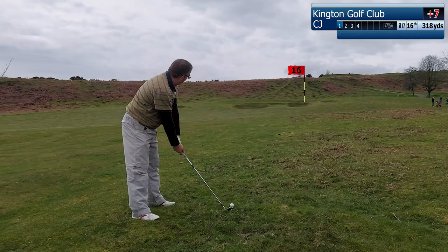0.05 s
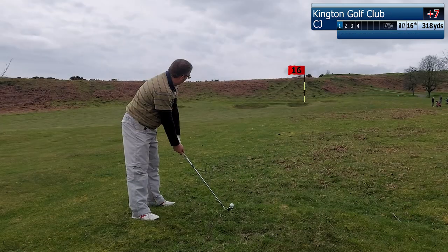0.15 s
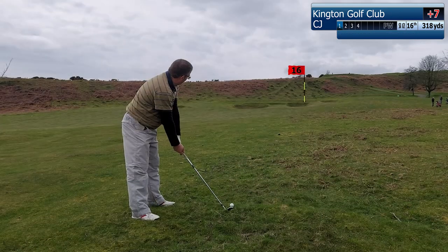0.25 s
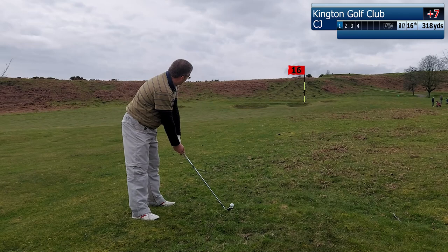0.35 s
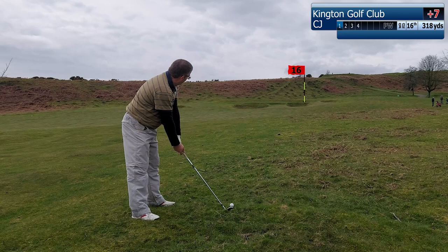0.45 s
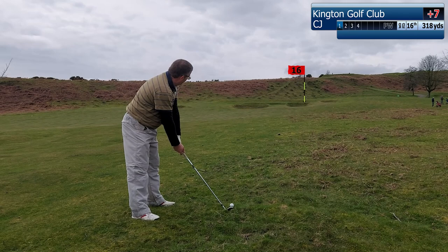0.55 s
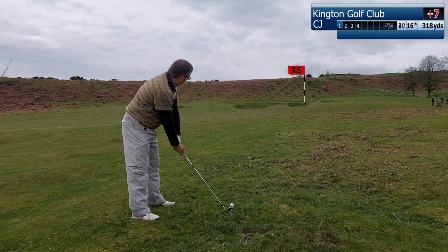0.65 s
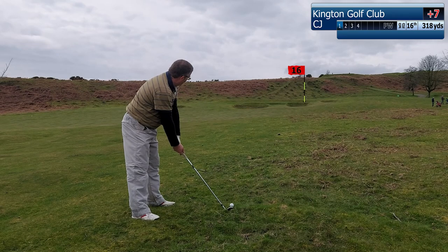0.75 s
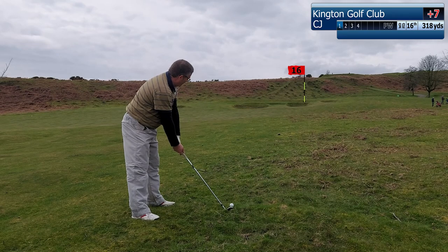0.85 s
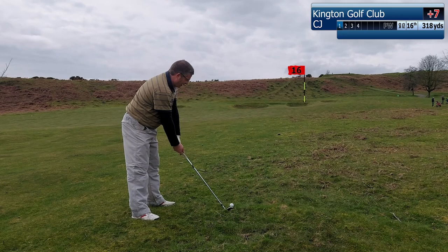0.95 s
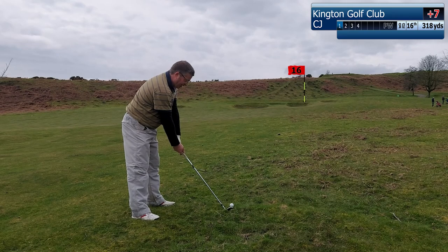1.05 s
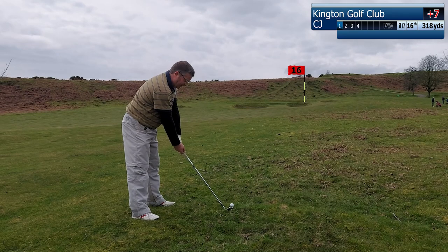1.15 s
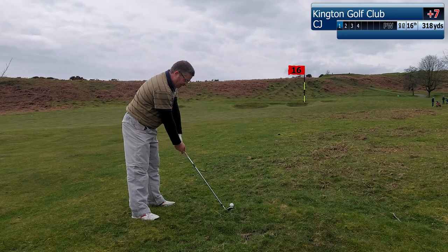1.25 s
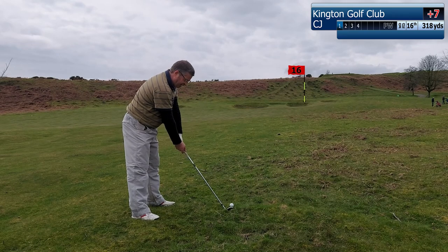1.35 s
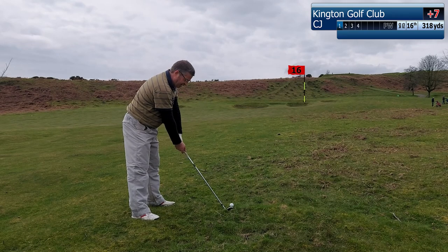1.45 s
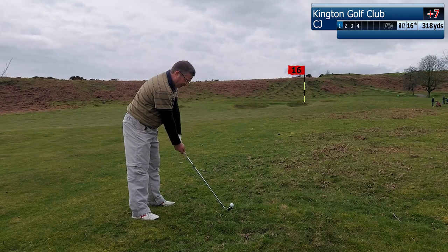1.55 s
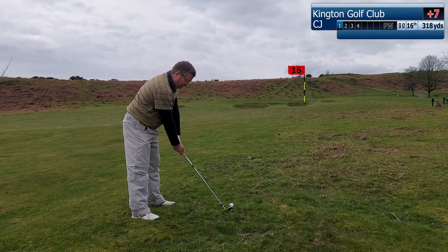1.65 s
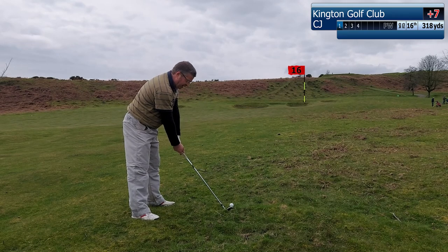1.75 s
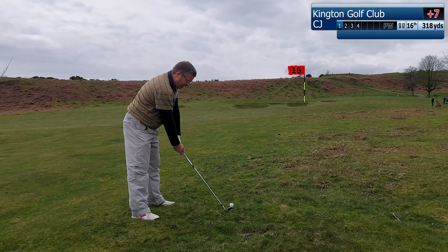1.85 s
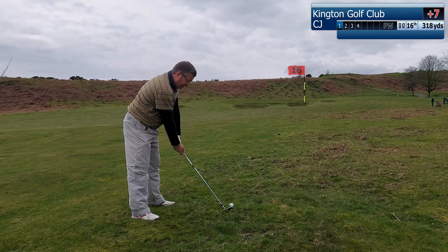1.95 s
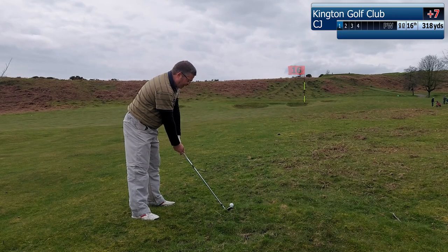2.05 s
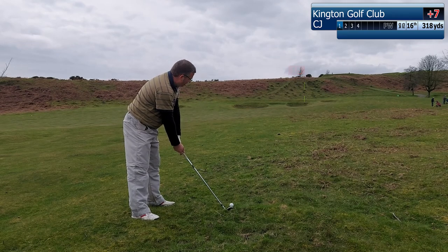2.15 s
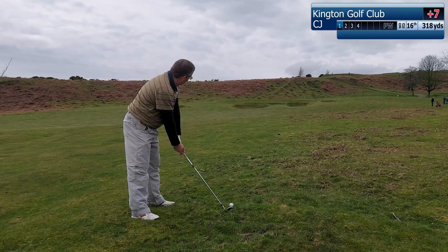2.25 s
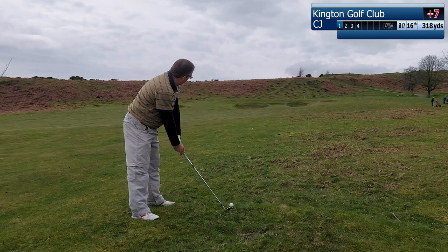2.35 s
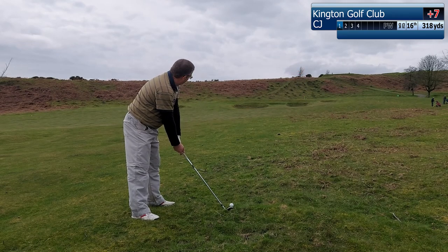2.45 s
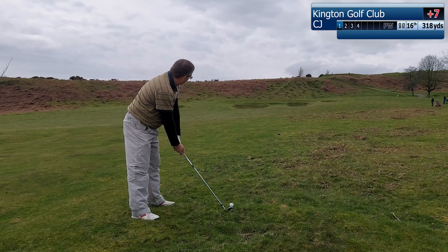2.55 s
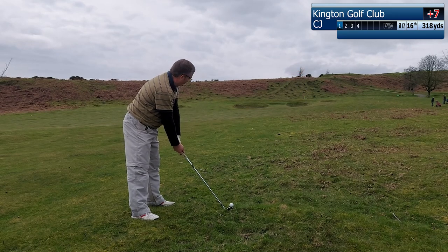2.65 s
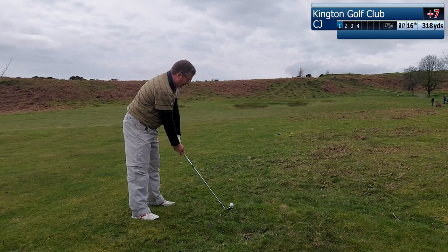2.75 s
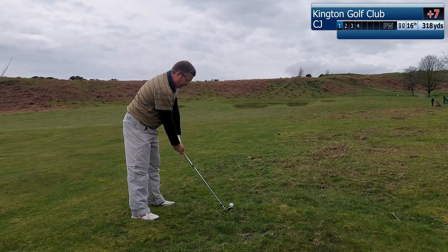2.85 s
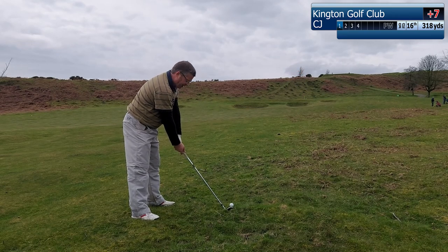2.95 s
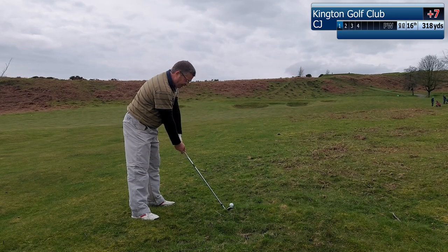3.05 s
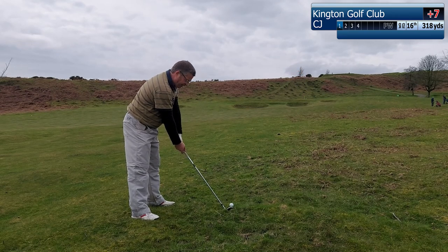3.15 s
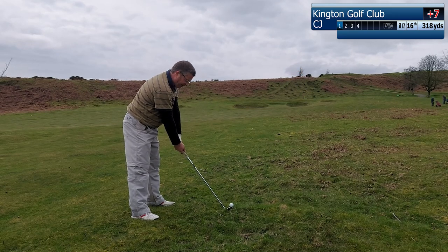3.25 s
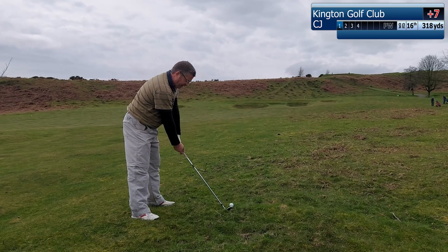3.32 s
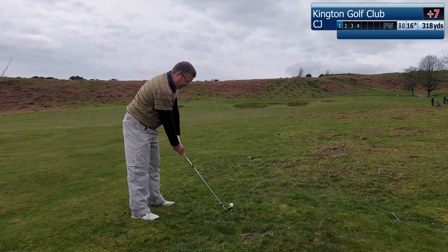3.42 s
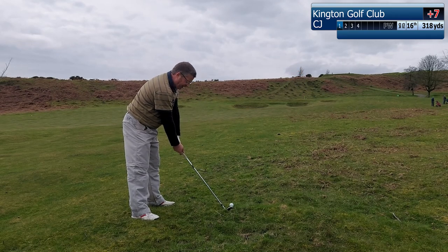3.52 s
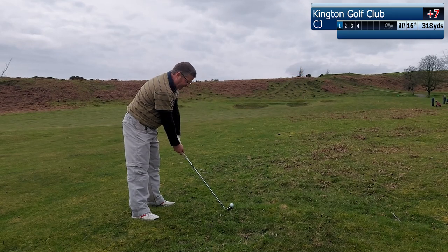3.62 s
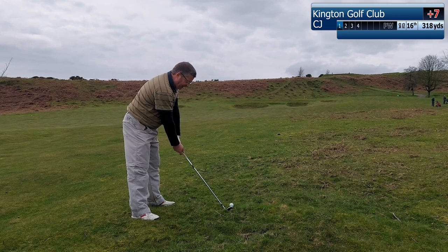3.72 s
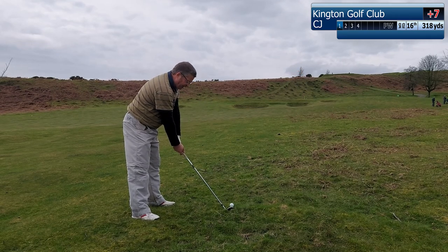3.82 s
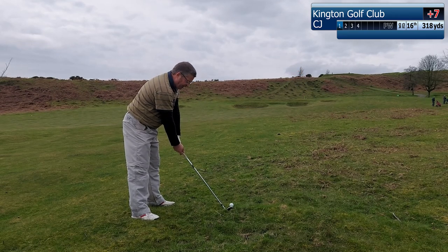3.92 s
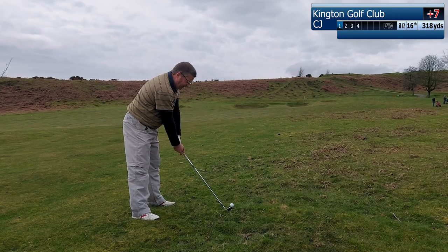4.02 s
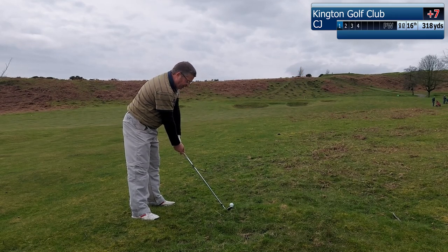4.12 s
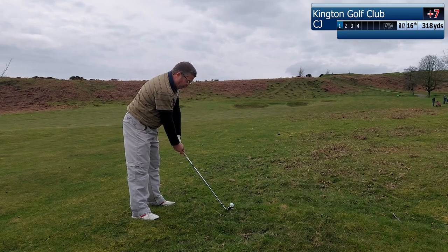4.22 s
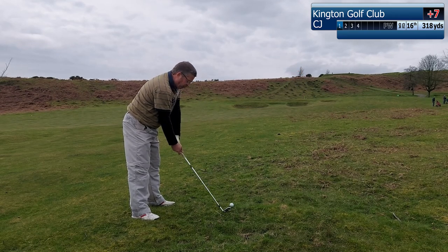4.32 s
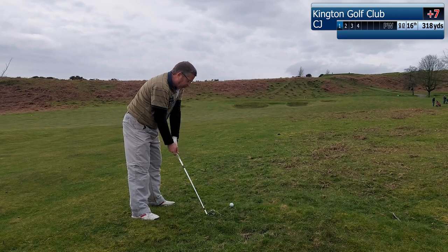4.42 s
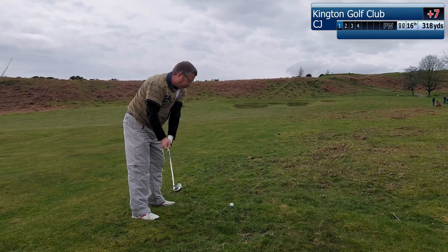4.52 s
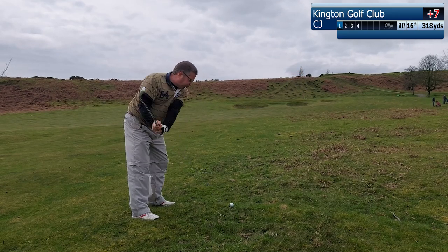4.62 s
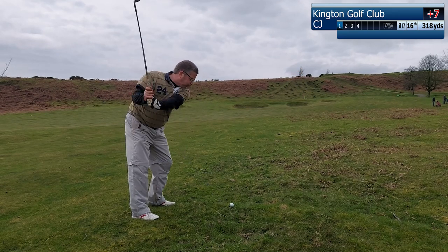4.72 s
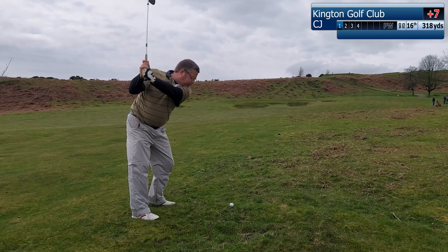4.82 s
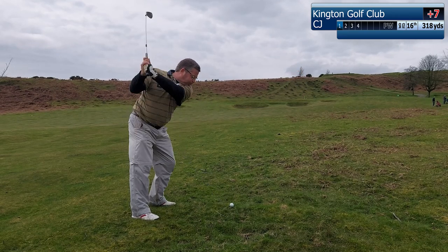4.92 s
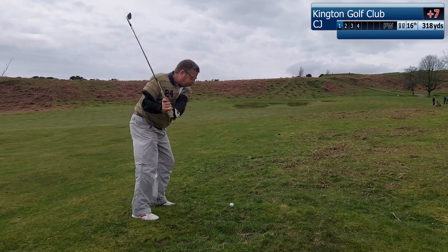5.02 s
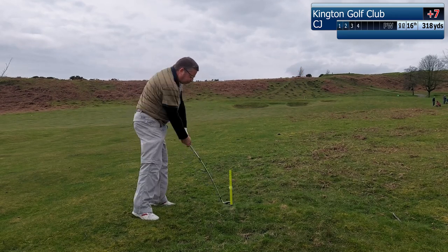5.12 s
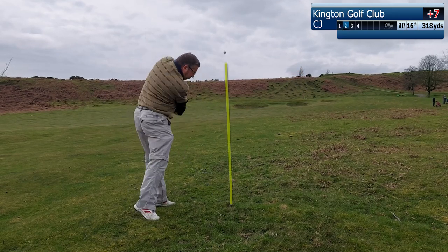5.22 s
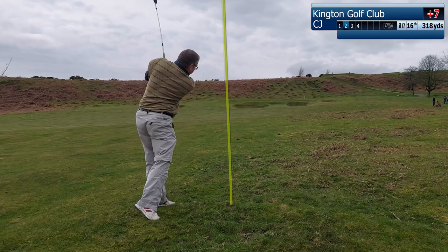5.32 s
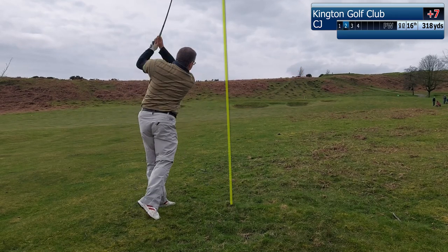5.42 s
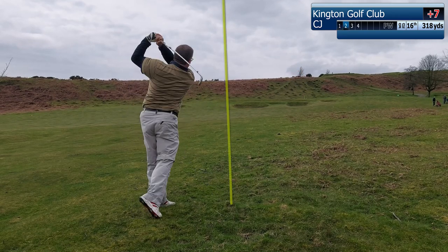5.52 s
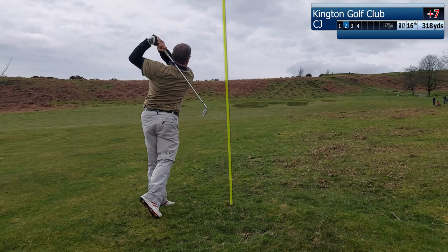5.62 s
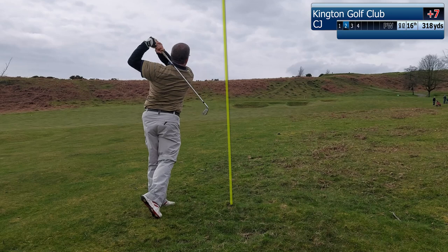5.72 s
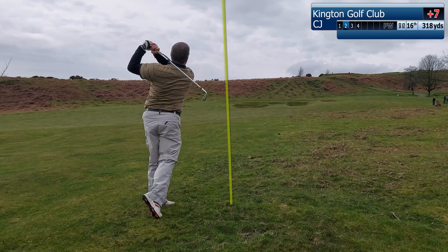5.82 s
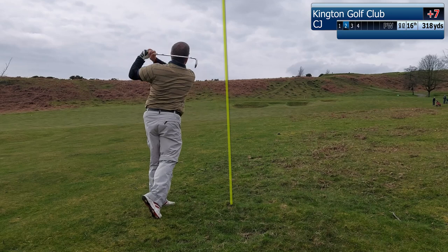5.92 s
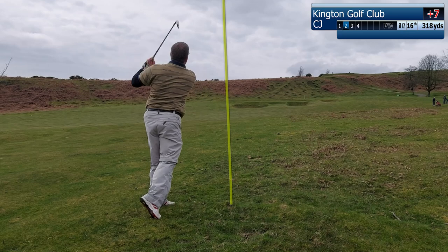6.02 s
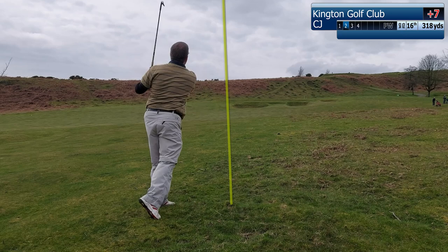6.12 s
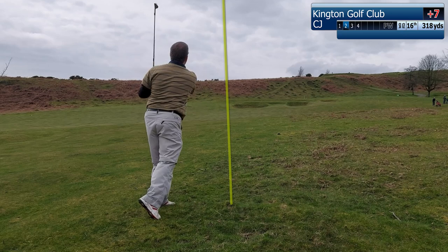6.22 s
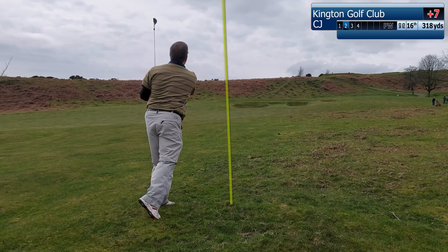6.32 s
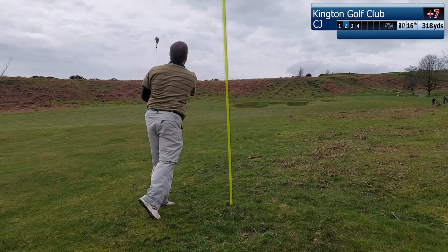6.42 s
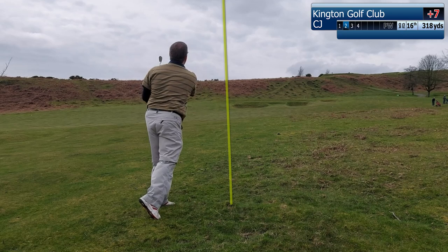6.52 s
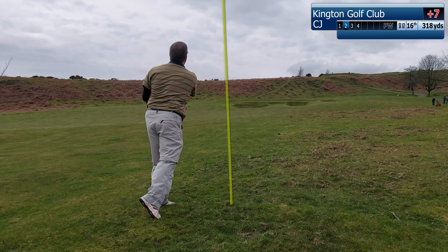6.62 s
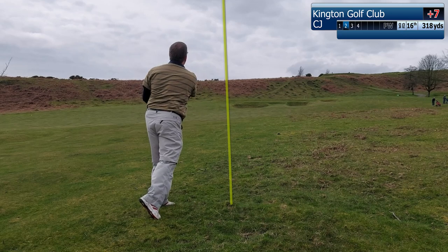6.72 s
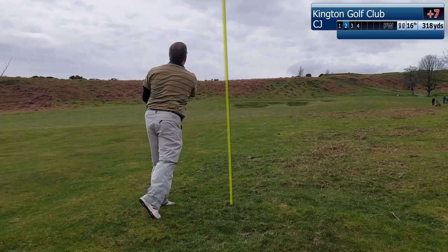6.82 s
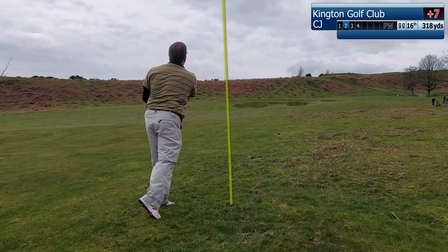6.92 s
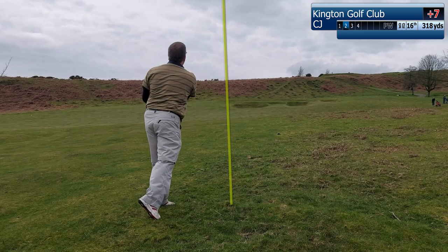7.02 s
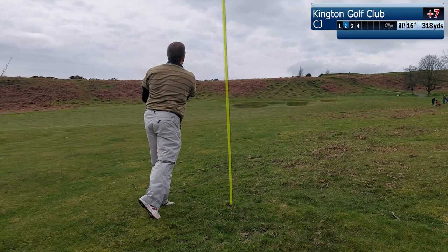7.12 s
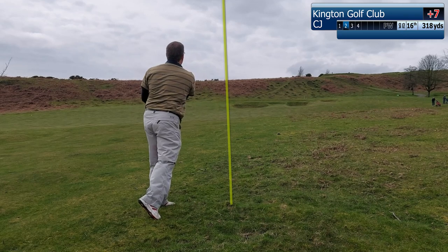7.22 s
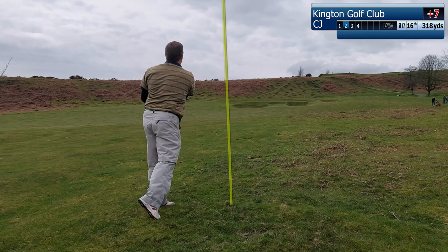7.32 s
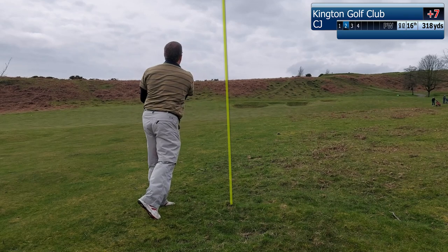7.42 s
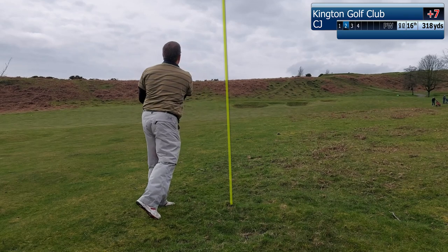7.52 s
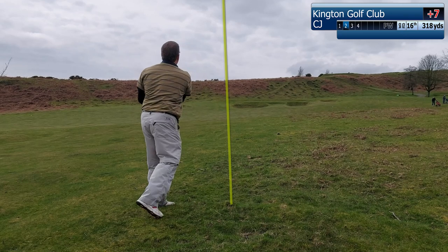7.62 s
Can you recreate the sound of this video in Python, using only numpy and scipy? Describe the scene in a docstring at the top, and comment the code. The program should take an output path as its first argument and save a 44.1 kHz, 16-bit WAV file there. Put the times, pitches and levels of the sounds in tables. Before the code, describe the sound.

An open hillside golf course in breezy weather, heard in stereo for about 7.7 seconds. Throughout, deep uneven gusts thump and flutter on the microphone, different at each side, over soft hiss and wind rushing through grass. From 0 to 1.3 s a bird to the right gives steady whistles around 3 kHz; from 1.4 to 3.4 s come quick throbbing trills and falling chirps, then rising whistles at 3.5 to 4.1 s and more trills until 4.9 s. The background dips around 5 s. At about 5.1 s a very brief swish climbs, and at 5.16 s an iron hits the ball: one loud, dry, sharp click with a low thud and a short hissy scuff of turf. From 6.0 to 6.9 s the nearest bird sings ten evenly spaced, clear notes, gradually descending. Wind returns, with chirps and tiny dry ticks near 7 s.

```python
"""Gusts buffet both microphone ports, songbirds whistle and trill from the right, and then
an iron strikes a golf ball off the turf of an open hillside course.
Wind and hiss are shaped noise, bird notes are gliding sines with scattered echoes, the swing
is rough noise with a hum, and the strike is soft clicks ringing short modes amid torn turf."""
import sys
import numpy as np
from scipy import signal
from scipy.fft import rfft, irfft
from scipy.io import wavfile

SR = 44100
rng = np.random.default_rng(int(sys.argv[2]) if len(sys.argv) > 2 else 0)


def dump_mix(stems):
    """Bounce the given channels to the path in sys.argv[1] as a 16-bit WAV at rate SR."""
    frames = np.atleast_2d(stems).T  # one column per channel
    limited = np.clip(frames, -1, 1)  # hard clip at full scale
    pcm = np.round(limited * 32767).astype(np.int16)
    wavfile.write(sys.argv[1], SR, pcm)


N = 338082

RIGHT_SOURCE_LAG_S = .00049   # sound from the right reaches the left port this much later


def from_db(db):
    """Turn decibels into gain."""
    return 10 ** (np.asarray(db) / 20)


def rms_one(x):
    """Scale to an average strength (rms) of 1."""
    return x / np.sqrt(np.mean(x ** 2) + 1e-20)


def in_time(rows):
    """Join the points of a table by straight lines: one curve per column after the time."""
    time_s, *columns = np.transpose(rows)
    return [np.interp(np.arange(N) / SR, time_s, column) for column in columns]


def drift(rate_hz):
    """Slow random wandering with spread 1: noise at every 40th sample, smoothed twice."""
    pole = np.exp(-80 * np.pi * rate_hz / SR)
    noise = rng.standard_normal(N // 40 + 2002)
    slow = signal.lfilter([1], [1, -2 * pole, pole * pole], noise)[2000:]   # skip the settling
    return np.interp(np.arange(N) / 40, np.arange(len(slow)), rms_one(slow))


def coloured(spectrum, channels, size=N):
    """Unrelated noises of the given spectrum, almost silent outside it; rms 1 overall."""
    hz, db = np.transpose(spectrum)
    log_hz = np.log(np.fft.rfftfreq(size, 1 / SR) + 1)
    shape = from_db(np.interp(log_hz, np.log(hz), db, left=-90, right=-90))
    return rms_one(irfft(rfft(rng.standard_normal((channels, size))) * shape, size))


def butter(order, hz, x, kind="low"):
    """Filter a sound with a smooth low-pass, high-pass or band-pass."""
    return signal.sosfilt(signal.butter(order, hz, kind, fs=SR, output="sos"), x)


def late(x, lag_s):
    """The same sound a fraction of a millisecond later."""
    return np.interp(np.arange(N) - lag_s * SR, np.arange(N), x)


# spectrum of the capsule hiss: (frequency [Hz], level [dB per Hz])
HISS_SPECTRUM = [(2500, 2), (6170, -1.5), (7830, -1.5), (9580, -12.5), (11000, -10), (12600, -5.5),
                 (16500, -5)]
HISS_DB, HISS_TREBLE_LEFT_DB, HISS_DIP_SHARE = -71.5, -.6, 0.97


def capsule_hiss(dip_db):
    """Steady noise of each capsule, a little weaker on the left and weaker still in its treble."""
    hiss = coloured(HISS_SPECTRUM, channels=2)
    hiss[0] += (from_db(HISS_TREBLE_LEFT_DB) - 1) * butter(4, 10500, hiss[0], "high")
    left_right_gain = from_db([[-1.8], [0]])
    return from_db(HISS_DB + HISS_DIP_SHARE * dip_db) * hiss * left_right_gain


# spectrum of wind in far grass and heath: (frequency [Hz], level [dB per Hz])
RUSH_SPECTRUM = [(150, -23), (290, -14.5), (432, -3.5), (722, -7), (1230, -15), (1810, -14), (2510, -20.5),
                 (3760, -27.5), (6000, -39.5)]
# strength of the far wind before its dip: (time [s], level [dB])
FAR_WIND_LEVEL = [(0, -59), (.9, -59.5), (2.3, -60), (3.4, -56.5), (4.1, -59.5), (4.45, -56.5), (6.3, -59),
                  (6.75, -51.5), (7.2, -60.5), (7.67, -57)]
# extra level of its bands above 1150 Hz: (time [s], level [dB])
UPPER_WIND_LEVEL = [(0, 4), (.7, 1), (1.1, -1), (1.6, 5), (2.2, 1), (3.0, 0), (3.9, -2), (4.7, -0.5),
                    (5.6, 0), (6.6, -1), (7.2, -2.5), (7.67, 2.5)]
RUSH_LIKENESS, RUSH_LEFT_DB = 0.27, -0.5   # share of power common to both ports; left trim
RUSH_PATCHY_DB, RUSH_GRAIN_DB = 1.5, 1     # slow and fast wandering of each band


def far_wind(dip_db):
    """Wind rushing through grass and heath: noise in patchy, grainy bands, partly from the right."""
    (rush_db,), (upper_db,) = in_time(FAR_WIND_LEVEL), in_time(UPPER_WIND_LEVEL)
    common, own_left, own_right = coloured(RUSH_SPECTRUM, channels=3)
    common_gain, own_gain = np.sqrt(RUSH_LIKENESS), np.sqrt(1 - RUSH_LIKENESS)
    left = common_gain * late(common, RIGHT_SOURCE_LAG_S) + own_gain * own_left
    right = common_gain * common + own_gain * own_right
    bins = rfft([left * from_db(RUSH_LEFT_DB), right])
    hz = np.fft.rfftfreq(N, 1 / SR)
    edges_hz = (0, 380, 650, 1150, 2300, SR)
    rush = 0
    for low, high in zip(edges_hz, edges_hz[1:]):
        patch_db = RUSH_PATCHY_DB * drift(3.5) + RUSH_GRAIN_DB * drift(35)
        patch_db = patch_db + upper_db * (low > 1000)
        rush = rush + from_db(patch_db) * irfft(bins * (hz >= low) * (hz < high), N)
    return from_db(rush_db + dip_db + 1.3 * drift(2.7)) * rush


PORT_LIKENESS = 0.13   # share of the buffeting power common to both ports


def at_ports(spectrum):
    """Buffeting noise, mostly unrelated at the two ports."""
    both, *own = coloured(spectrum, channels=3)
    return np.sqrt(PORT_LIKENESS) * both + np.sqrt(1 - PORT_LIKENESS) * np.array(own)


# buffets: (time of the peak [s], rumble level [dB], left minus right [dB],
#           flutter above the rumble [dB])
BUFFETS = [(.02, -34, -2.5, -15.5), (.14, -33.5, 5, -19.5), (0.295, -39, 1.5, -6), (.6, -39, 2, -36),
           (.72, -36.5, 6, -18.5), (.88, -33, 2, -13), (1.01, -43, -3, 0), (1.36, -48, -3, -17),
           (1.6, -41.5, -1, -17.5), (1.84, -40.5, 1, -22), (2.17, -45, 4, -7), (2.34, -42.5, 1, -6.5),
           (2.52, -45, 2, -26), (2.78, -39, -4.5, -14), (3.0, -47, -16, -11.5), (3.682, -37.5, 9, -8.5),
           (3.9, -44.5, 7, -7.5), (4.08, -44.5, -8, -5), (4.226, -33.5, 4, -9.5), (4.82, -46, -8, -3),
           (5.19, -33.5, -7.5, -11.5), (5.56, -43, 2, -2.5), (5.77, -37.5, -4, -9), (5.959, -43, 4.5, -24),
           (6.281, -39.5, 5.5, -12), (6.601, -39, 4.5, -6.5), (7.108, -38, 0.5, 0), (7.335, -46, -4, 5),
           (7.4, -49, 0, 7), (7.59, -40, 2.5, -12)]
# spectrum of the deep rumble: (frequency [Hz], level [dB per Hz])
RUMBLE_SPECTRUM = [(15, -20.5), (24, -5), (45, 2.5), (90, 0), (160, -27)]
# spectrum of the faster flutter: (frequency [Hz], level [dB per Hz])
FLUTTER_SPECTRUM = [(70, -20), (120, 2), (200, -7.5), (320, -21), (800, -38)]
# each buffet stays at its peak for the hold time on either side
GUST_RISE_DB_PER_S, GUST_FALL_DB_PER_S, GUST_HOLD_S = 239, 180, 0.034
BREEZE_DB, BREEZE_FLUTTER_DB = -50.5, -57   # always present beneath the buffets


def gusts():
    """Air buffeting the ports: lumpy deep rumble and faster flutter that rise, hold and fall."""
    t = np.arange(0, N, 40) / SR
    peak_s, peak_db, pan_db, flutter_db = np.transpose(BUFFETS)[:, :, None]
    rise_db = GUST_RISE_DB_PER_S * (peak_s - GUST_HOLD_S - t)
    fall_db = GUST_FALL_DB_PER_S * (t - peak_s - GUST_HOLD_S)
    shape_db = peak_db - np.maximum(0, np.maximum(rise_db, fall_db))

    def total(extra_db, base_db):
        """Add the powers of the breeze and all buffets."""
        return np.sqrt(from_db(2 * base_db) + from_db(2 * (shape_db + extra_db)).sum(axis=0))

    left, right = total(pan_db / 2, BREEZE_DB), total(-pan_db / 2, BREEZE_DB)
    flutter = total(flutter_db, BREEZE_FLUTTER_DB)
    left, right, flutter = in_time(np.transpose([t, left, right, flutter]))
    shared = drift(10)
    lumps_db = np.array([1.5 * shared + 2.2 * drift(13) for port in range(2)])
    rumble = np.array([left, right]) * from_db(lumps_db) * at_ports(RUMBLE_SPECTRUM)
    return rumble + flutter * from_db(1.75 * lumps_db) * at_ports(FLUTTER_SPECTRUM)


# small dry ticks, perhaps shoe or clothing: (time [s], level [dB], pitch [Hz])
DRY_TICKS = [(5.4879, -69, 7900), (6.9431, -57.5, 6000), (7.1831, -63, 6100), (7.3064, -62, 5020)]


def ticks():
    """Each tick is a dying mix of a tone and noise, a few milliseconds long, without bass."""
    out, t = np.zeros(N), np.arange(int(.012 * SR)) / SR
    for start_s, level_db, hz in DRY_TICKS:
        grain = np.sin(2 * np.pi * hz * t) + 0.59 * rng.standard_normal(len(t))
        first = int(start_s * SR)
        out[first:first + len(t)] += from_db(level_db - 60 * t / 0.019) * grain
    return butter(2, 2500, out, "high")


# Every bird note below becomes one row: (start [s], length [s], start pitch [Hz],
# middle pitch [Hz], end pitch [Hz], level [dB], throbs [per s], swell [dB per s])
SWELL_DB_PER_S = 25   # most notes grow towards their end
CHATTER_DB = -80.5    # level of the faintest chatter away from the stroke


def far_chatter():
    """Many short faint notes from birds further off, mostly falling in pitch."""
    when, long, pitch, glide, level = rng.random((600, 5)).T
    start_s = when * N / SR
    hz = 2800 * (5500 / 2800) ** pitch
    end_hz = hz * (1 + 0.08 * (glide - .65))
    throbs = np.where(long > .5, 75.0, 0)
    quieter_db = 6 * (abs(start_s - 5.25) < .3)   # around the stroke
    level_db = CHATTER_DB + 7 * level ** 3 - quieter_db
    swell = np.full(600, SWELL_DB_PER_S)
    length_s = .012 + 0.045 * long
    rows = [start_s, length_s, hz, (hz + end_hz) / 2, end_hz, level_db, throbs, swell]
    return [*np.transpose(rows)]


# whistles on one pitch: (start [s], length [s], pitch [Hz], level [dB])
HELD_WHISTLES = [(0.0, 0.098, 2990, -66.5), (0.103, 0.14, 3056, -62), (0.266, 0.14, 3040, -59.5),
                 (0.493, 0.043, 3080, -57.5), (0.568, 0.095, 3080, -54.5), (0.668, 0.07, 3000, -66),
                 (0.772, 0.023, 2960, -58.5), (0.781, 0.24, 3080, -52), (1.018, 0.2, 3070, -68.5),
                 (1.162, 0.14, 3076, -55), (1.465, .11, 4770, -68), (2.12, 0.054, 4950, -73),
                 (4.11, .15, 3820, -73), (4.251, 0.06, 2960, -70), (4.42, .14, 3850, -73),
                 (4.57, 0.013, 3930, -56), (0.531, 0.011, 4630, -59), (4.673, .02, 3950, -68),
                 (4.115, 0.012, 5620, -69.5), (5.756, 0.047, 4210, -65), (5.6, .042, 4250, -71),
                 (7.2, .026, 3980, -72), (7.348, .02, 2550, -70), (7.374, 0.038, 3500, -66),
                 (7.402, .028, 2850, -65), (7.478, .035, 3600, -59)]
HELD_SCOOP, HELD_SAG = 0.0193, 0.012   # enters and leaves flat by these shares of the pitch
HELD_SWELL_DB_PER_S = -6               # fades slightly


def held_whistles():
    """Nearly steady whistles that scoop up at the start and sag at the end."""
    return [(s, length, hz * (1 - HELD_SCOOP), hz, hz * (1 - HELD_SAG), db, 0, HELD_SWELL_DB_PER_S)
            for s, length, hz, db in HELD_WHISTLES]


# falling whistles: (start [s], length [s], from [Hz], to [Hz],
#                    share of the drop done half way [1], end level [dB], growth over the note [dB])
FALLING_WHISTLES = [(.497, .05, 3860, 3620, 0.73, -71, 2), (0.813, 0.18, 5630, 3800, 0.27, -71, -1),
                    (0.987, 0.03, 5200, 3450, 0.55, -56.5, 8), (.567, .011, 4520, 4220, .5, -50, 0),
                    (7.528, .025, 4080, 3850, .4, -68, 0), (2.725, .025, 4200, 3970, .5, -61, 1),
                    (2.4, .06, 5260, 4850, .5, -74, 0), (3.091, 0.019, 3850, 3400, 0.35, -60, -3),
                    (3.192, 0.045, 4900, 4580, .3, -70, 0), (3.261, 0.028, 3610, 3390, .7, -63.5, 2),
                    (3.276, 0.04, 5060, 4570, .3, -64, 8), (5.19, .06, 4480, 3860, .62, -77, -7),
                    (5.243, .275, 3890, 3070, .7, -75, -3), (5.359, .15, 5050, 4250, .68, -60, 26),
                    (3.936, 0.012, 5650, 5200, .4, -56, 0), (5.637, .117, 4130, 4085, 2.6, -67, 3),
                    (5.384, 0.038, 5200, 4980, 0.64, -79, 2), (5.458, 0.098, 3800, 3550, 0.68, -82, -4),
                    (6.68, 0.04, 3870, 3430, .4, -70, 3), (7.164, 0.035, 4700, 3640, 0.25, -66, -3),
                    (7.437, 0.029, 3850, 3400, 0.45, -65, 0)]


def falling_whistles():
    """Whistles that slide down, each with its own curve and growth."""
    return [(s, length, a, a + done * (b - a), b, db, 0, growth_db / length)
            for s, length, a, b, done, db, growth_db in FALLING_WHISTLES]


# rising whistles: (start [s], length [s], from [Hz], to [Hz], level [dB])
RISING_SWEEPS = [(3.527, 0.058, 3320, 5020, -63.5), (3.708, 0.041, 3430, 4800, -63),
                 (3.865, 0.085, 2830, 5680, -56), (4.043, 0.063, 2960, 4350, -54)]
SWEEP_HALF_WAY = .33         # share of the rise done half way: sweeps steepen
SWEEP_SWELL_DB_PER_S = 70    # and grow louder towards the top


def rising_sweeps():
    """Whistles that sweep upwards, faster and louder towards the top."""
    return [(s, length, a, a + SWEEP_HALF_WAY * (b - a), b, db, 0, SWEEP_SWELL_DB_PER_S)
            for s, length, a, b, db in RISING_SWEEPS]


# runs of one short note moving in pitch: (first start [s], last start [s], spacing [s],
#   note length [s], first pitch [Hz], last pitch [Hz], slide down as share of pitch [1], level [dB])
NOTE_RUNS = [(0.602, 0.639, .036, 0.0095, 4060, 3560, 0.045, -55),
             (1.956, 2.08, .031, 0.024, 2790, 2110, 0.13, -62.5),
             (2.386, 2.414, .03, 0.011, 4500, 4370, 0.041, -67),
             (3.847, 4.061, .0265, 0.0071, 4800, 4330, 0.047, -64.5),
             (6.994, 7.034, .014, .009, 3920, 3980, -.24, -60),
             (7.531, 7.644, .056, 0.03, 3580, 3480, 0.035, -64)]
RUN_SCATTER_DB = 1.5   # random spread of the note levels


def note_runs():
    """Quick repeats of one sliding note, stepping evenly in time and pitch."""
    rows = []
    for first, last, spacing, length, a, b, slide, db in NOTE_RUNS:
        for share in np.linspace(0, 1, round((last - first) / spacing) + 1):
            hz = a + share * (b - a)
            level_db = db + RUN_SCATTER_DB * rng.normal()
            rows.append((first + share * (last - first), length, hz, hz * (1 - slide / 2),
                         hz * (1 - slide), level_db, 0, SWELL_DB_PER_S))
    return rows


# throbbing notes: (start [s], length [s], from [Hz], to [Hz],
#                   bow of the middle above a straight glide [Hz], level [dB], throbs [per s])
TRILLED_NOTES = [(0.776, 0.038, 4950, 5150, -60.5, -56, 100), (1.39, 0.08, 3850, 3590, 23, -65, 96),
                 (1.625, 0.075, 3370, 3520, -42, -71, 55), (1.682, 0.06, 5070, 4900, 30.5, -73, 83),
                 (1.741, 0.086, 4900, 4200, 65, -60, 82), (1.832, 0.07, 4650, 4150, 30, -59, 81),
                 (1.882, .042, 4000, 3550, 20, -58, 90), (1.929, 0.068, 3940, 3500, 33, -60, 95),
                 (2.207, 0.081, 5110, 4760, -250, -63.5, 75), (2.248, .18, 4000, 3180, -150, -62, 94),
                 (2.315, .055, 4120, 3780, 20, -67, 90), (2.69, 0.049, 4700, 4000, -1.5, -66, 95),
                 (2.783, 0.052, 3450, 3240, 58, -64, 49), (2.971, 0.038, 3330, 3140, 22, -60, 83),
                 (3.016, 0.045, 4110, 4280, 253, -57, 85), (3.143, 0.045, 4290, 4480, 44, -63.5, 120),
                 (3.18, 0.048, 3960, 3700, 40, -68, 105), (3.338, 0.091, 4360, 4540, 13, -62, 320),
                 (4.352, .1, 5000, 5300, -28, -68, 70), (4.552, 0.036, 5200, 5050, 80.5, -59, 80),
                 (4.615, 0.078, 5150, 4520, -100, -64.5, 72), (4.732, .11, 4480, 4420, -4, -65.5, 73),
                 (4.764, 0.11, 3674, 3620, 24, -58, 65), (5.575, 0.075, 4680, 4500, 0, -73, 92),
                 (5.86, 0.071, 4590, 2820, -120, -64, 150), (5.982, 0.09, 4380, 3570, -77, -71, 90),
                 (6.129, 0.051, 3980, 2850, 50, -66.5, 53), (6.241, 0.11, 4400, 3300, 97, -72, 78),
                 (6.296, 0.12, 2780, 3050, -2, -71, 63), (6.53, 0.061, 3290, 3300, 196, -60, 57),
                 (6.93, 0.066, 3080, 3400, 165, -55.5, 83), (7.044, 0.016, 3750, 3550, 0, -60, 57),
                 (7.255, .03, 4200, 4500, 6, -63, 78), (7.281, 0.021, 3600, 3950, 100, -61, 85),
                 (7.293, 0.024, 4800, 4880, 52, -68.5, 110), (7.331, 0.026, 3800, 3400, 0, -67, 94)]


def trilled_notes():
    """Gliding notes that throb quickly."""
    return [(s, length, a, (a + b) / 2 + bow, b, db, throbs, SWELL_DB_PER_S)
            for s, length, a, b, bow, db, throbs in TRILLED_NOTES]


# the nearest song, ten hooked notes: (start [s], pitch [Hz],
#   entry above the pitch as share [1], exit above the pitch as share [1], level [dB])
NEAREST_SONG = [(6.04, 5240, 0.058, 0.15, -53), (6.133, 5020, 0.028, 0.065, -45.5),
                (6.233, 4920, 0.07, 0.11, -53.5), (6.33, 4720, 0.053, 0.037, -50),
                (6.415, 4610, -.045, -0.0085, -53.5), (6.497, 4430, -0.047, 0.00039, -53.5),
                (6.582, 4440, -0.036, -0.00069, -57.5), (6.663, 4410, -0.0074, 0.031, -51),
                (6.747, 4440, -0.11, -0.037, -52.5), (6.828, 4470, -0.058, -0.037, -64)]
SONG_NOTE_S = .058


def nearest_song():
    """Equal-length notes that hook into and out of their middle pitch."""
    return [(s, SONG_NOTE_S, hz * (1 + entry), hz, hz * (1 + leave), db, 0, SWELL_DB_PER_S)
            for s, hz, entry, leave, db in NEAREST_SONG]


ECHO_DB, ECHO_T60_S = -10, .3   # T60: time to fall by 60 dB


def hillside(x):
    """Scattered echoes off ground and trees: a short dying noise tail at each port."""
    t = np.arange(int(.3 * SR)) / SR
    tail = rng.standard_normal((2, len(t))) * from_db(-60 * t / ECHO_T60_S) * (t > .004)
    tail = tail / np.sqrt(np.sum(tail ** 2, axis=1, keepdims=True))
    return from_db(ECHO_DB) * signal.fftconvolve(x[None], tail, axes=1)[:, :N]


BIRD_LEFT_DB = -4.5   # heard from the right: weaker at the left port
TRILL_DEPTH, TRILL_FLICK_HZ = .95, 110
WAVER_DB, TILT_DB_PER_OCTAVE = 2.2, -10
NEAR_DRYNESS, FAR_LEVEL_DB = .5, -68   # louder birds are nearer: echo dB lost per dB above far level


def birds():
    """Sines on curved glides; trills throb in level and flick in pitch; moving air frays them all."""
    left, right, echoed = np.zeros((3, N))
    waver, fray = drift(20), drift(90)
    ears = ((left, RIGHT_SOURCE_LAG_S, BIRD_LEFT_DB / 2), (right, 0, -BIRD_LEFT_DB / 2))
    rows = (far_chatter() + held_whistles() + falling_whistles() + rising_sweeps()
            + note_runs() + trilled_notes() + nearest_song())
    for start_s, length, start_hz, mid_hz, end_hz, level_db, throbs, swell in rows:
        pitch = np.polyfit([0, length / 2, length], [start_hz, mid_hz, end_hz], deg=2)
        cycles = np.polyint(pitch)
        steep = min(abs(end_hz - start_hz) / length / 40000, .6)   # fast glides are rougher
        lowest_hz = min(start_hz, mid_hz, end_hz)
        at = np.arange(int(start_s * SR), min(N, int((start_s + length) * SR)))
        for ear, lag, ear_db in ears:
            t = at / SR - start_s - lag
            wobble = (.3 * fray[at] + .8 * waver[at]) * (throbs > 0)
            throb = np.sin(2 * np.pi * throbs * t + wobble)
            rise = np.clip(t / (0.002 + 0.07 * length), 0, 1)
            fall = np.clip((length - t) / (0.001 + .14 * length), 0, 1)
            fade = np.sin(np.pi / 2 * rise * fall) ** 2
            # a glide is loudest at its low end, except on long rises
            high_db = TILT_DB_PER_OCTAVE * np.log2(np.polyval(pitch, t) / lowest_hz)
            high_db = high_db * (end_hz < 1.3 * start_hz)
            swell_db = swell * (t - length)
            level = from_db(level_db + ear_db + swell_db + high_db + WAVER_DB * waver[at]) * fade
            flick = TRILL_FLICK_HZ / max(throbs, 1) * throb
            phase = 2 * np.pi * np.polyval(cycles, t) + flick + (0.07 + steep) * fray[at]
            note = np.sqrt(2) * level * (1 + TRILL_DEPTH * throb) ** 0.59 * np.sin(phase)
            ear[at] += note
            echoed[at] += note * from_db(-NEAR_DRYNESS * max(level_db - FAR_LEVEL_DB, 0))
    return np.array([left, right]) + hillside(echoed)


# club head cutting the air: (time [s], level [dB], eddy shedding [Hz])
DOWNSWING = [(5.08, -80.5, 348.7), (5.105, -53, 444), (5.125, -42.5, 640), (5.15, -41, 900),
             (5.158, -31, 950), (5.168, -57, 940), (5.19, -61.5, 703), (5.23, -74, 500)]
# spectrum of the swish before filtering: (frequency [Hz], level [dB per Hz])
SWISH_SPECTRUM = [(120, -9), (300, -5), (524, 1), (849, -5), (1530, -10), (2200, -11), (3530, -21),
                  (5600, -24.5), (15000, -36)]
# the treble grows with this power of the shedding pitch; the level flickers by this spread
SWISH_BRIGHT_POWER, SWISH_ROUGH_DB = 1.5, 1.6


def swish():
    """Rough turbulence off shaft and head; treble and eddy hum climb as the club speeds up."""
    level_db, shedding_hz = in_time(DOWNSWING)
    mid, left, right = coloured(SWISH_SPECTRUM, channels=3)
    low = butter(2, 1600, mid)   # the low part is the same at both ports: straight ahead
    wide = butter(2, 1600, [mid + .6 * left, mid + .6 * right], "high")
    wide = butter(2, 11000, wide) * (shedding_hz / 700) ** SWISH_BRIGHT_POWER
    hum = drift(160) * np.sin(2 * np.pi * np.cumsum(shedding_hz) / SR)
    return from_db(level_db + SWISH_ROUGH_DB * drift(120)) * (low + wide + .7 * hum)


STRIKE_START, STRIKE_SIZE = int(5.14 * SR), int(.25 * SR)   # in samples
# sole meets turf, edge nicks ball, face meets ball, rebound, two ground echoes:
# (time [s], level [dB], softness cut [Hz])
BLOWS = [(5.15735, 5.5, 320), (5.15971, -5.3, 2210), (5.16014, -14.4, 7450), (5.16087, -10.1, 3360),
         (5.16221, -20.4, 3030), (5.16334, -12.4, 1080)]
STRIKE_RIGHT_LAG_S = .00002   # the ball lies a little left of the axis


def contact_push():
    """Each contact is a click; a softer contact has less treble."""
    push = np.zeros((2, STRIKE_SIZE))
    port_lag_s = np.array([[0], [STRIKE_RIGHT_LAG_S]])
    for time_s, level_db, cut_hz in BLOWS:
        place = (time_s + port_lag_s) * SR - STRIKE_START
        click = np.sinc(np.arange(STRIKE_SIZE) - place) * from_db(level_db)
        push += butter(2, min(cut_hz, .4 * SR), click)
    return push


# ringing modes of club head and ball: (frequency [Hz], level [dB], time to fall by 60 dB [s],
#                                       left minus right [dB])
HEAD_AND_BALL = [(100, -34, .043, -1), (480, -24, .025, -.5), (786, -20, .017, 1.5), (1379, 5.4, .0027, 3),
                 (1740, 9.4, .0013, 3), (3060, -6, .009, 0), (4658, -9, .011, -3), (5365, -2.5, .0026, -1),
                 (6115, 1.2, .0037, -2.5), (7500, -3, .005, 4), (10350, 10.5, .0048, 5.5),
                 (11900, 5, .003, 2)]


def head_and_ball():
    """The contacts push short resonances of head and ball, which ring and die."""
    push, sound = contact_push(), np.zeros((2, STRIKE_SIZE))
    for k, (hz, level_db, t60, pan_db) in enumerate(HEAD_AND_BALL):
        r, w = from_db(-60 / (t60 * SR)), 2 * np.pi * hz / SR
        ring = signal.lfilter([0, np.sin(w)], [1, -2 * r * np.cos(w), r * r], push)
        sign = (-1) ** (k - (hz > 1000))
        sound += from_db(level_db + pan_db * np.array([[.5], [-.5]])) * ring * sign
    return butter(8, 12300, sound)   # softens the highest ringing


CRACK_DB, BRUSH_T60_S, CRACK_T60_S = -29, .008, .018   # swells into the blow, then dies
DIVOT_DB, DIVOT_T60_S = -63, .3                        # flying turf rustles on


def torn_turf():
    """A burst of hissy noise around the moment the edge nicks the ball, with a rustling tail."""
    after = np.arange(STRIKE_SIZE) / SR + STRIKE_START / SR - BLOWS[1][0]
    turf = butter(4, [1500, 13000], rng.standard_normal((2, STRIKE_SIZE)), "band")
    decay = np.where(after > 0, after / CRACK_T60_S, -after / BRUSH_T60_S)
    crack = turf * from_db(CRACK_DB - 60 * decay)
    return crack + turf * from_db(DIVOT_DB - 60 * after / DIVOT_T60_S) * (after > 0)


def strike():
    """The blow: ringing head and ball together with torn turf."""
    out = np.zeros((2, N))
    out[:, STRIKE_START:STRIKE_START + STRIKE_SIZE] = head_and_ball() + torn_turf()
    return out


# wind and hiss dip around the stroke and come back slowly: (time [s], level [dB])
STROKE_DIP = [(4.9, -0.5), (5.02, -8), (5.38, -9.5), (5.6, -3.5), (6.3, 0.5)]


def scene():
    """Everything at the two microphone ports, from background to main source."""
    dip_db, = in_time(STROKE_DIP)
    background = capsule_hiss(dip_db) + far_wind(dip_db) + from_db(dip_db) * gusts()
    return background + ticks() + birds() + swish() + strike()


CUTOFF_HZ = 15850


def record(dry):
    """A steep low-pass removes the highest treble: 70 dB down from the cutoff upwards."""
    return signal.sosfilt(signal.cheby2(24, 70, CUTOFF_HZ, fs=SR, output="sos"), dry)


dry = scene()
out = record(dry)
dump_mix(out)
```